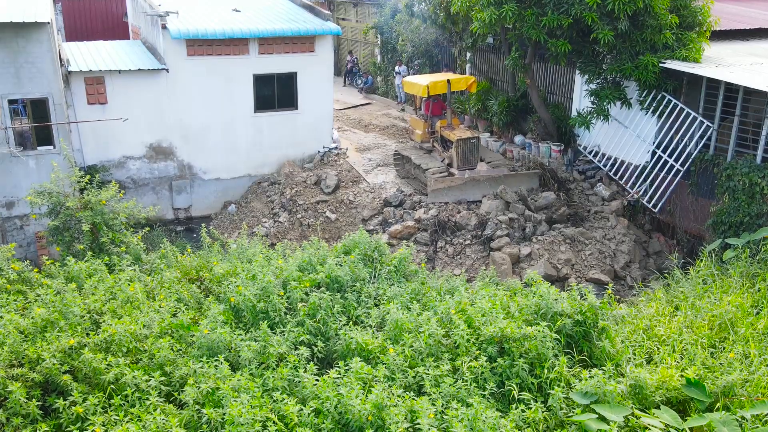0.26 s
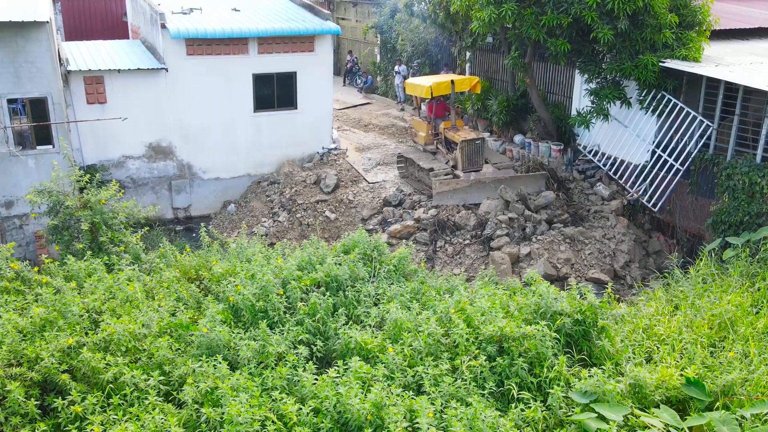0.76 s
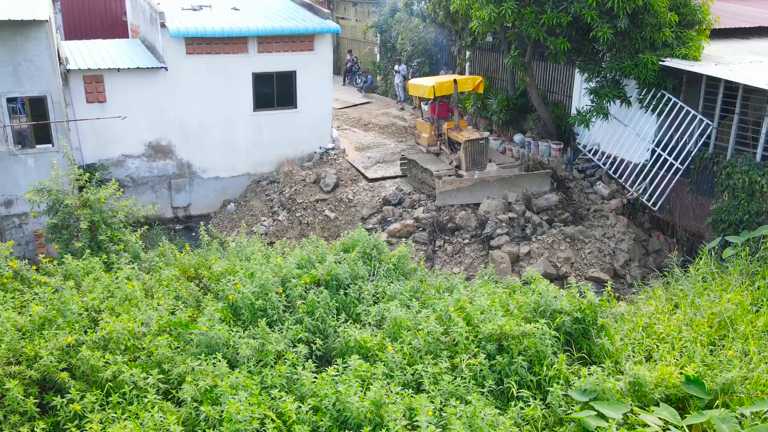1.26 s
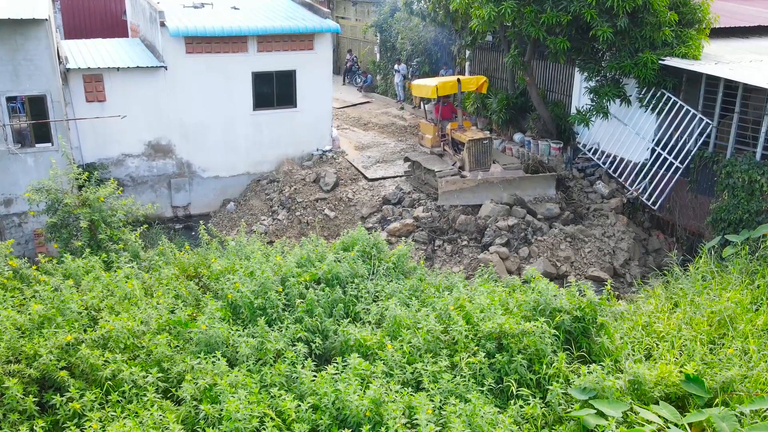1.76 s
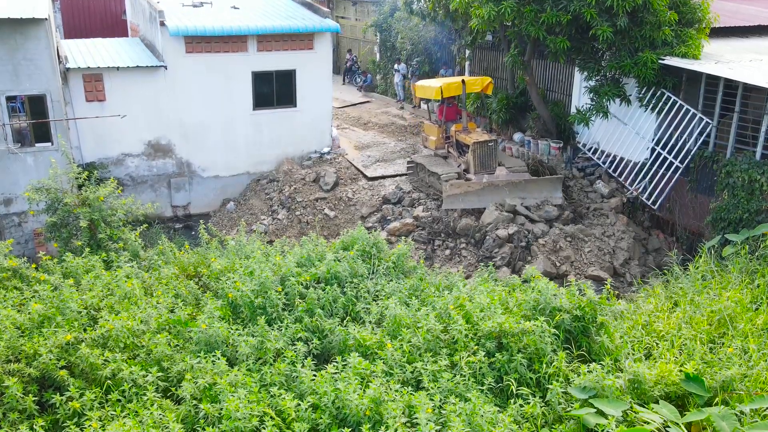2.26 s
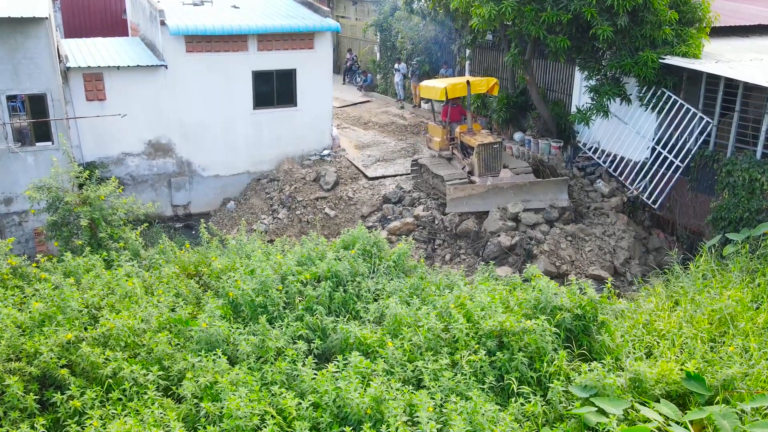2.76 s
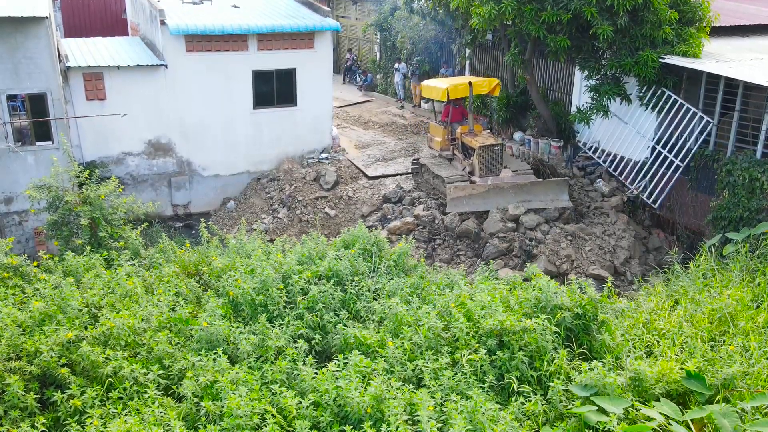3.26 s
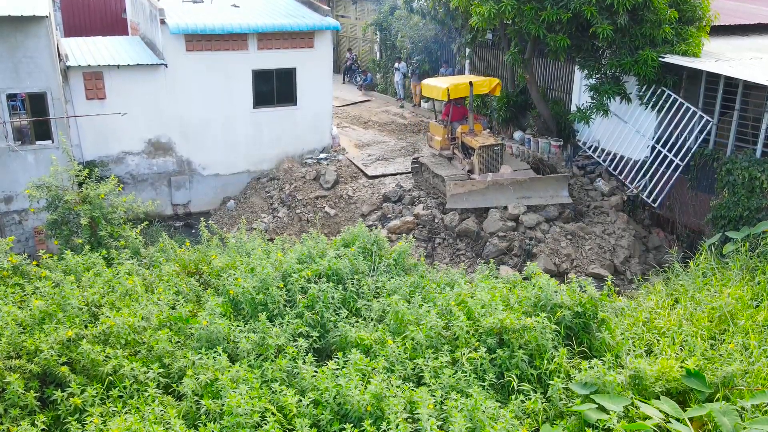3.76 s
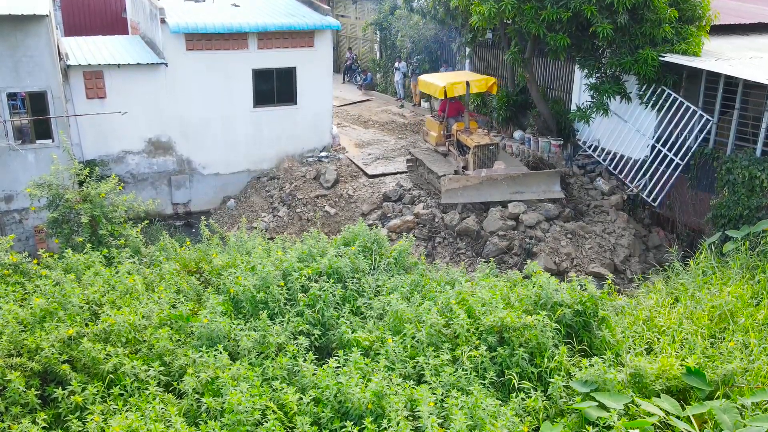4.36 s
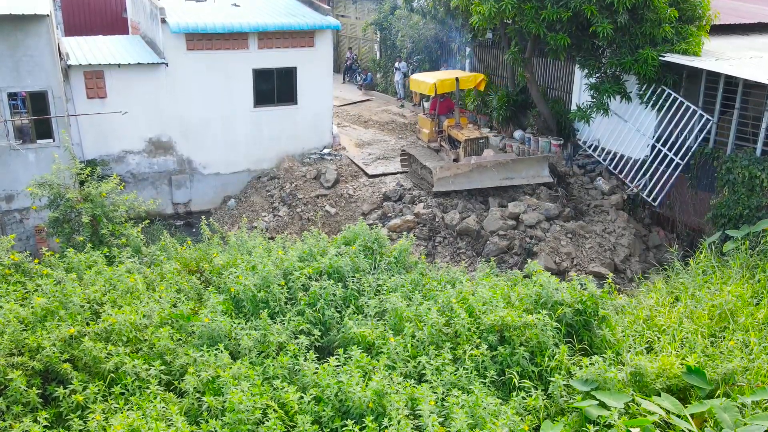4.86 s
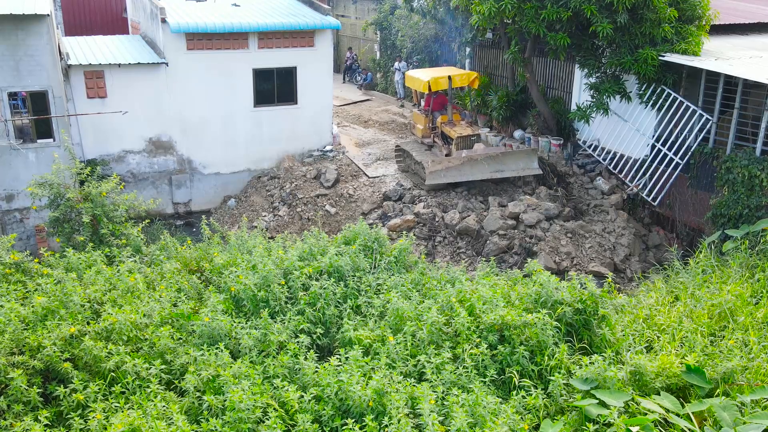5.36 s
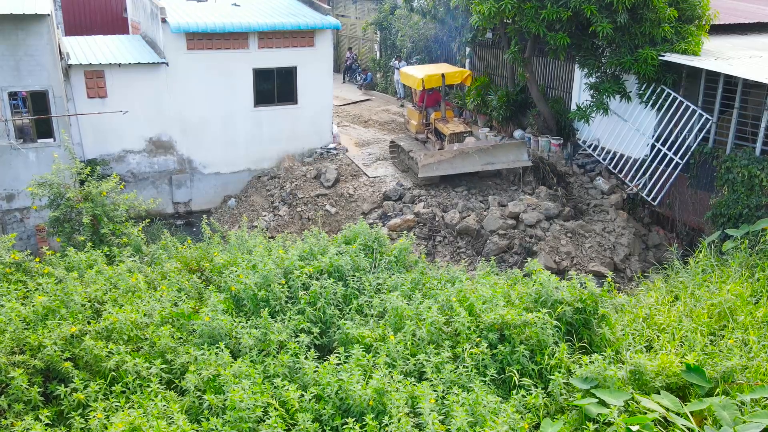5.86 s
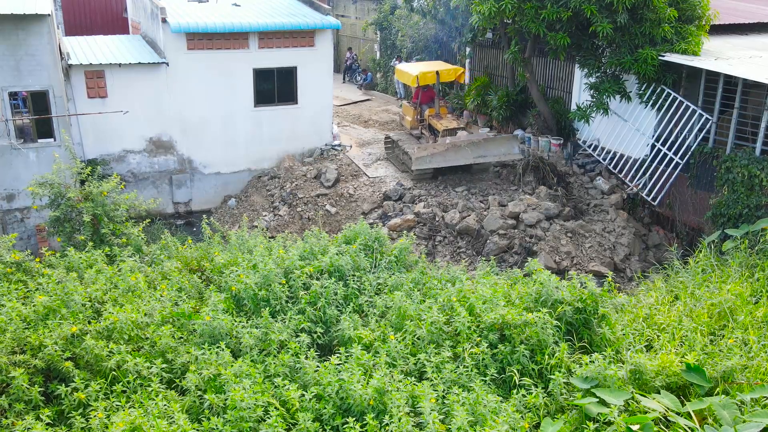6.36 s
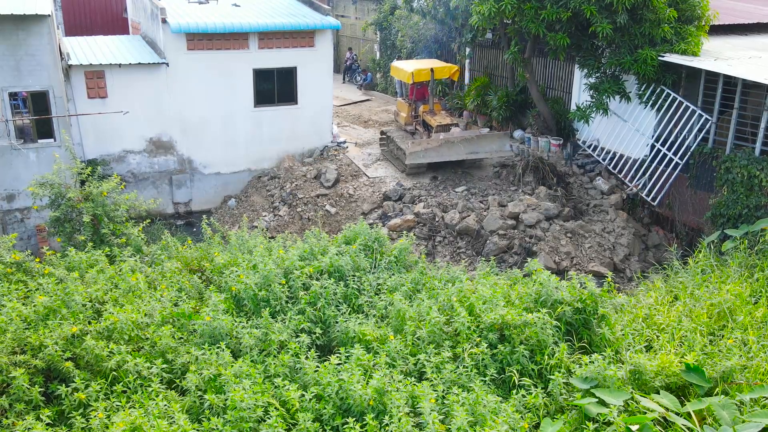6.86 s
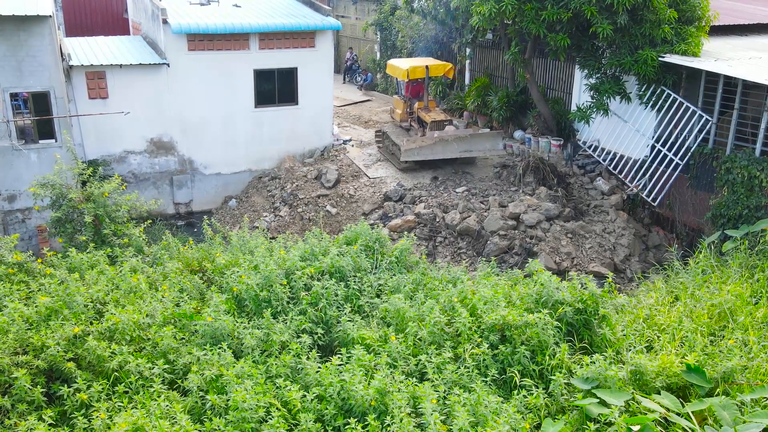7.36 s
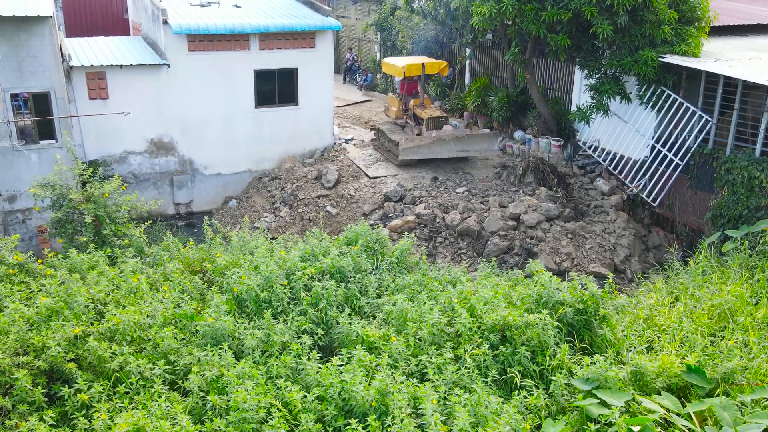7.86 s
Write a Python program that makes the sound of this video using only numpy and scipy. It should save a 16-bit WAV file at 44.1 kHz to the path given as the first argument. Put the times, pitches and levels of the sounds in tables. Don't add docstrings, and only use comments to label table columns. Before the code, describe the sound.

Continuous heavy diesel, low and pulsing, with whining hydraulics swelling in short heaves and steel links knocking irregularly. A bright clank stands out before four seconds. The engine then runs lighter and slightly higher through a gear change, sags abruptly as reverse bites, and recovers unevenly. Outdoor distance, two close microphones, centred bass and wider rough noise, limited treble.

```python
import sys
import numpy as np
from scipy import signal
from scipy.fft import rfft, irfft, dct, next_fast_len
from scipy.io import wavfile
from scipy.ndimage import uniform_filter1d

SR = 44100
rng = np.random.default_rng(int(sys.argv[2]) if len(sys.argv) > 2 else 0)


def put_to_file(sound):
    columns = np.atleast_2d(sound).T
    safe = np.clip(columns, -1, 1)
    whole_steps = np.round(safe * 32767)
    wavfile.write(sys.argv[1], SR, whole_steps.astype(np.int16))


def ratio_of_db(decibels):
    return 10 ** (np.asarray(decibels, float) / 20)


N = 357651
NEUTRAL_START_S, NEUTRAL_END_S, CLUTCH_S = 4.95, 6.07, 0.04


def rms_one(x):
    return x / np.sqrt(np.mean(x ** 2) + 1e-20)


def in_time(rows):
    s, value = np.transpose(rows)
    return np.interp(np.arange(N) / SR, s, value)


def at_hz(points, hz):
    table_hz, value = np.transpose(points)
    return np.interp(np.log(hz), np.log(table_hz), value)


def drift(rate_hz):
    r = np.exp(-80 * np.pi * rate_hz / SR)
    slow = signal.lfilter([1], [1, -2 * r, r * r], rng.standard_normal(N // 40 + 2002))[2000:]
    return np.interp(np.arange(N) / 40, np.arange(len(slow)), rms_one(slow))


def ring(clicks, hz, t60_s):
    r, w = ratio_of_db(-60 / (t60_s * SR)), 2 * np.pi * hz / SR
    return signal.lfilter([0, np.sin(w)], [1, -2 * r * np.cos(w), r * r], clicks + 1e-18)


def tones(turn_rad, orders, waver_db, waver_rad, rate_hz):
    out = 0
    for multiple, db in orders:
        gain = np.sqrt(2) * ratio_of_db(db + waver_db * drift(rate_hz))
        out = out + gain * np.sin(multiple * turn_rad + waver_rad * drift(rate_hz))
    return out


def after(s):
    return 0.5 + 0.5 * np.tanh((np.arange(N) / SR - s) / CLUTCH_S)


def swells(rows):
    t = np.arange(N) / SR
    return sum(db * np.exp(-(2 * (t - s) / length_s) ** 4) for s, length_s, db in rows)


def layer_db(law, load_db, work_db):
    usual_load_db, usual_work_db = -17, -23
    db, per_load, per_work, neutral_db, reverse_db, wander_db = law
    reverse = after(NEUTRAL_END_S)
    neutral = after(NEUTRAL_START_S) - reverse
    load_part = per_load * (load_db - usual_load_db)
    work_part = per_work * (work_db - usual_work_db)
    gear_part = neutral_db * neutral + reverse_db * reverse
    return db + load_part + work_part + gear_part + wander_db * drift(1.5)


def exhaust(turn_rad, first_db, second_db, third_db, rasp_db, uneven_db):
    # time in seconds, phase of the 2nd harmonic in radians.
    skew = [(0, -1.3), (.4, -.5), (1.45, .35), (3.45, -.3), (4.2, .3), (4.9, .3), (5.4, -.6), (6.2, .4),
            (7.1, .9), (7.6, .1)]
    # multiple of the cycle, level in dB.
    rasp_orders = [(16, -6), (20, -3.5), (24, -17), (28, -3.5), (30, -5), (32, -0.5)]
    # multiple of the cycle, level in dB.
    uneven_orders = [(3, -3), (5, 2), (6, -3.5), (7, -12), (9, -9), (10, -13.5), (11, -8)]
    harmonics = ((1, first_db, 0.5, 0), (2, second_db, 1.03, 2.75), (3, third_db, 1.3, 2.3))
    beat = 0
    for k, db, waver_db, lag_rad in harmonics:
        firing_rad = 4 * turn_rad + 0.023 * drift(8.3)
        phase = k * firing_rad - lag_rad
        if k == 2:
            phase = phase - in_time(skew)
        beat = beat + ratio_of_db(db + waver_db * drift(18)) * np.cos(phase)
    rasp = ratio_of_db(rasp_db) * tones(turn_rad, rasp_orders, waver_db=4.0, waver_rad=0.54, rate_hz=3.0)
    uneven = ratio_of_db(uneven_db) * tones(turn_rad, uneven_orders, waver_db=2.0, waver_rad=0.41, rate_hz=2.1)
    return np.sqrt(2) * beat + rasp + uneven


def whines(turn_rad, cycle_hz, drive_db, pump_db):
    # multiple of the cycle, level in dB.
    fan_orders = [(5.25, -40.5), (10.5, -36), (15.75, -39.5), (21.0, -49)]
    # multiple of the cycle, level in dB.
    pump_orders = [(36, 0), (72, -6.5), (108, -5), (144, -11.5), (180, -14), (252, -4.5)]
    # multiple of the cycle, level in dB.
    gear_orders = [(34.8, -45.5), (45.0, -42), (52.3, -33.5), (69.7, -38.5), (234.5, -51.5)]
    # time in seconds, whine turns per cycle.
    slip = [
        (0, 18.5),
        (4.85, 17.7),
        (5.0, 18.45),
        (5.92, 18.45),
        (6.07, 19),
        (6.2, 18.2),
        (8.11, 18.6),
    ]
    # time in seconds, length in seconds, rise in dB.
    blade = [
        (0.0, 0.26, 5.5),
        (.5, 0.12, 7),
        (.88, 0.25, 6),
        (1.74, 0.53, 11),
        (3.0, 0.82, 3.5),
        (3.68, 0.14, 4),
        (4.1, .35, 7),
        (4.7, 0.35, 5.5),
    ]
    forward_end_s = 4.92
    forward = 1 / (1 + np.exp((np.arange(N) / SR - forward_end_s) / 0.041))
    fan = tones(turn_rad, fan_orders, waver_db=3.5, waver_rad=0.58, rate_hz=2.75)
    strain_db = swells(blade)
    pump = 0
    for gate, share, orders in ((1, 1, pump_orders[:1]), (forward, 0.45, pump_orders[1:])):
        gain = gate * ratio_of_db(pump_db + share * strain_db)
        pump = pump + gain * tones(turn_rad, orders, waver_db=3.0, waver_rad=0.69, rate_hz=5.6)
    gears = forward * tones(turn_rad, gear_orders, waver_db=3.0, waver_rad=1.16, rate_hz=4.1)
    shaft_rad = np.cumsum(2 * np.pi * cycle_hz * in_time(slip) / SR)
    drive_orders = [(1, 2.5), (2, -11.5)]
    drive = ratio_of_db(drive_db) * tones(shaft_rad, drive_orders, waver_db=1.0, waver_rad=0.15, rate_hz=6.8)
    return fan + pump + gears + drive


def roar(turn_rad, roar_db, rattle_db):
    # frequency in Hz, density at the right port in dB per Hz.
    density_db = [(30, -17.5), (60, -4), (100, -3.5), (150, -6.5), (230, -7.5), (300, -1), (400, -4.5),
                  (600, -3.5), (1000, -6), (1800, -12), (3000, -13.5), (6000, -26), (8000, -31.5),
                  (11500, -36.5)]
    out, together = 0, drift(6.9)
    edges_hz = 25 * 2 ** np.arange(0, 9.6, 0.5)
    white = rng.standard_normal((2, 2, N))
    for k, (low, high) in enumerate(zip(edges_hz, edges_hz[1:])):
        sos = signal.butter(2, [low, high], "band", fs=SR, output="sos")
        band = signal.sosfilt(sos, white[k % 2])
        hz = np.sqrt(low * high)
        bright = np.clip(np.log2(hz / 1200) / 1.4, 0, 1)
        level_db = (1 - bright) * (roar_db + 17) + bright * (rattle_db + 25.5)
        flicker_db = (0.28 + 0.7 * bright) * (0.75 * together + 1.1 * drift(10.0))
        firing_db = 0.35 * bright * np.cos(4 * turn_rad)
        out = out + ratio_of_db(at_hz(density_db, hz) + level_db + flicker_db + firing_db) * band
    return out


def tracks(rattle_db):
    # time in seconds, peak in dB, ring in Hz, ring level in dB.
    clanks = [
        (2.4064, -22, 2020, -14),
        (3.5754, -15.5, 3120, -14.5),
        (6.2838, -26, 2560, -15),
        (7.352, -27, 2650, -10),
    ]
    sizes = ratio_of_db(3.1 * np.minimum(rng.exponential(1, N), 5)) * rng.choice([-1, 1], N)
    born = rng.random(N) < 250 * ratio_of_db(5.0 * drift(7.0)) / SR
    dealt = rng.integers(0, 12, N)
    knocks = 0
    for k, hz in enumerate(np.geomspace(900, 5000, 12)):
        knocks = knocks + ring(sizes * born * (dealt == k), hz, 40 / hz)
    out = ratio_of_db(rattle_db - 7.5) * rms_one(knocks)
    age_s = np.arange(SR // 10) / SR
    sos = signal.butter(1, [1800, 9000], "band", fs=SR, output="sos")
    for s, peak_db, hz, ring_db in clanks:
        scuff = signal.sosfilt(sos, rng.standard_normal(len(age_s)))
        burst = scuff * np.exp(-(age_s / 0.019) ** 2)
        clank = burst + ratio_of_db(ring_db) * ring(burst, hz, 0.026)
        start = round((s - 0.003) * SR)
        out[start:start + len(age_s)] += ratio_of_db(peak_db - 3.5) * clank
    return out


def scene():
    # time in seconds, four-stroke cycles in Hz.
    speed = [(0.0, 16.62), (0.3, 16.4), (0.65, 16.6), (1.12, 16.5), (1.68, 16.82), (2.45, 16.48),
             (2.88, 16.73), (3.4, 16.22), (3.9, 16.36), (4.83, 16.46), (5.03, 17.26), (5.91, 17.18),
             (6.07, 16.3), (6.26, 15.83), (6.65, 16.3), (7.34, 16.57), (7.7, 16.02), (8.11, 16.14)]
    # time in seconds, level of the firing tone in dB.
    load = [(0, -16.5), (1.4, -17.5), (1.8, -18), (2.75, -19), (3.1, -18.5), (3.55, -15), (4.4, -17),
            (4.93, -17), (5.08, -26), (5.6, -24.5), (5.93, -28.5), (6.09, -13), (6.8, -15), (7.2, -20),
            (7.5, -19), (7.84, -18.5), (8.0, -18), (8.11, -17.5)]
    # time in seconds, level of the roar in dB.
    work = [(0, -20.5), (1.9, -22.5), (2.3, -21.5), (4.5, -24), (4.9, -26.5), (6.2, -24.5), (6.7, -23),
            (7.7, -23), (8.11, -21.5)]
    # time in seconds, length in seconds, rise in dB.
    steer = [
        (.15, 0.55, 5.5),
        (1.28, 0.44, 2),
        (3.2, 0.17, 7.5),
        (3.84, 0.33, 2.5),
        (5.7, 0.79, 0.5),
        (7.47, 0.26, 5.5),
    ]
    # usual dB, share of load, share of work, dB in neutral, dB in reverse, wander in dB.
    second_law = (-22, 0.63, 0.77, -1, 0.6, 0.6)
    third_law = (-33.5, 0.7, 0, -12, 2.5, 2)
    rasp_law = (-36.5, 0.04, -0.37, -6, -1, 0.6)
    uneven_law = (-36, -0.1, -1.2, -4, 2.5, 2)
    rattle_law = (-28.5, -0.09, 0.1, -4.5, -1.4, 0.41)
    pump_law = (-39, -0.2, 0.7, -2, -8.5, 1.0)
    drive_law = (-38.5, -0.21, 0.57, 9, 1.5, 2)
    # frequency in Hz, likeness of the two ports from 0 to 1.
    likeness = [(100, .98), (250, .92), (500, .54), (850, .75), (1150, .66), (1800, .76), (2500, .65),
                (3900, .3), (4500, .75), (4950, .85), (5250, .3), (5650, .995), (7000, .98), (8300, .35),
                (11000, .9)]
    # frequency in Hz, left over right in dB.
    balance_db = [(100, 0.1), (250, 0), (350, -2.4), (520, -8), (900, -3.5), (1400, -0.5), (2400, 0),
                  (3000, -0.5), (3800, -6), (4600, 1), (5600, -3.5), (7000, -0.9), (11000, 5)]
    # frequency in Hz, lead of the right port in radians.
    lead_rad = [(200, .08), (430, 1.5), (580, .6), (830, 3.1), (1150, 4.3), (1850, 5.2), (2500, 4.1),
                (4150, 4.5), (4350, 3.5), (5150, 3.0), (5600, .05), (7200, -.1), (8500, -2.1),
                (10500, -2.9)]

    cycle_hz, load_db, roar_db = in_time(speed), in_time(load), in_time(work)
    laws = (second_law, third_law, rasp_law, uneven_law, rattle_law, pump_law, drive_law)
    second_db, third_db, rasp_db, uneven_db, rattle_db, pump_db, drive_db = (
        layer_db(law, load_db, roar_db) for law in laws)
    turn_rad = np.cumsum(2 * np.pi * cycle_hz / SR)

    engine = exhaust(turn_rad, load_db, second_db, third_db, rasp_db, uneven_db)
    whine = whines(turn_rad, cycle_hz, drive_db + swells(steer), pump_db)
    shared, scattered = roar(turn_rad, roar_db, rattle_db)
    parts = engine + whine + tracks(rattle_db)

    size = next_fast_len(N + 4096)
    hz = np.maximum(np.arange(size // 2 + 1) * SR / size, 1)
    alike = np.clip(at_hz(likeness, hz), 0, 1)
    lead = at_hz(lead_rad, hz) * np.minimum(hz / lead_rad[0][0], 1)
    direct = rfft(parts, size) + alike * rfft(shared, size)
    left = direct * np.exp(-1j * lead) + np.sqrt(1 - alike ** 2) * rfft(scattered, size)
    left = irfft(left * ratio_of_db(at_hz(balance_db, hz)), size)[:N]
    return np.array([left, parts + shared])


def starve(pair):
    # frequency in Hz, limit in dB against both channels nearby.
    limit_db = [(100, -42), (340, -29), (700, -21), (1400, -18), (2600, -13.5), (4000, -10), (4500, -7),
                (5000, -5), (5700, -11), (6900, -6), (8300, -4), (9600, -3), (11000, -1.5), (11800, 6)]
    offset, hop = 492, 1024
    rise = np.cumsum(np.kaiser(hop + 1, 4 * np.pi))
    rise = np.sqrt(rise[:-1] / rise[-1])
    fall = rise[::-1]
    lead_in = hop - offset
    both = np.pad([pair[0] + pair[1], pair[0] - pair[1]], ((0, 0), (lead_in + hop, 3 * hop)))
    hops = both[:, :both.shape[1] // hop * hop].reshape(2, -1, hop)
    a, b = np.split(hops[:, :-1] * rise, 2, axis=2)
    c, d = np.split(hops[:, 1:] * fall, 2, axis=2)
    folded = np.concatenate([-c[..., ::-1] - d, a - b[..., ::-1]], axis=2)
    lines = dct(folded, type=4, norm="ortho")

    nearby = uniform_filter1d((lines ** 2).sum(0), size=24, axis=1)
    nearby = uniform_filter1d(nearby, size=5, axis=0)
    mood = uniform_filter1d(rng.standard_normal((2, len(nearby), hop // 16)), size=3, axis=1)
    mood_db = 6.6 * np.repeat(mood, 16, axis=2)
    line_hz = (np.arange(hop) + 0.5) * SR / 2 / hop
    limit = ratio_of_db(at_hz(limit_db, line_hz) + mood_db) * np.sqrt(np.abs(nearby))
    step = limit / 0.6 + 1e-12
    coarse = np.sign(lines) * np.floor(np.abs(lines) / step + 0.4) * step
    strength = np.repeat((lines ** 2).reshape(2, -1, hop // 16, 16).mean(3), 16, axis=2)
    coarse = coarse * (strength > (0.75 * limit) ** 2)

    late, early = np.split(dct(coarse, type=4, norm="ortho"), 2, axis=2)
    heads = np.concatenate([early, -early[..., ::-1]], axis=2) * rise
    tails = np.concatenate([-late[..., ::-1], -late], axis=2) * fall
    total, gap = (heads[:, 1:] + tails[:, :-1]).reshape(2, -1)[:, lead_in:lead_in + N]
    return np.array([total + gap, total - gap]) / 2


def top_cut(x):
    return signal.sosfilt(signal.butter(12, 11880, fs=SR, output="sos"), x)


def record(dry):
    rounded = 1.5 * np.tanh(dry / 1.5)
    return top_cut(starve(rounded))


dry = scene()
out = record(dry)
put_to_file(out)
```